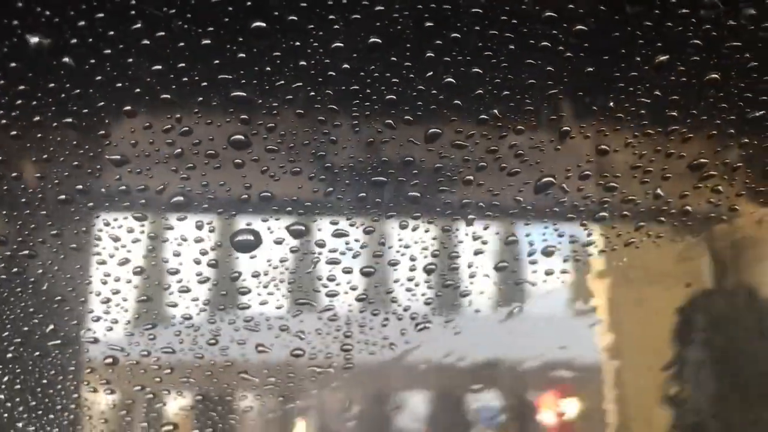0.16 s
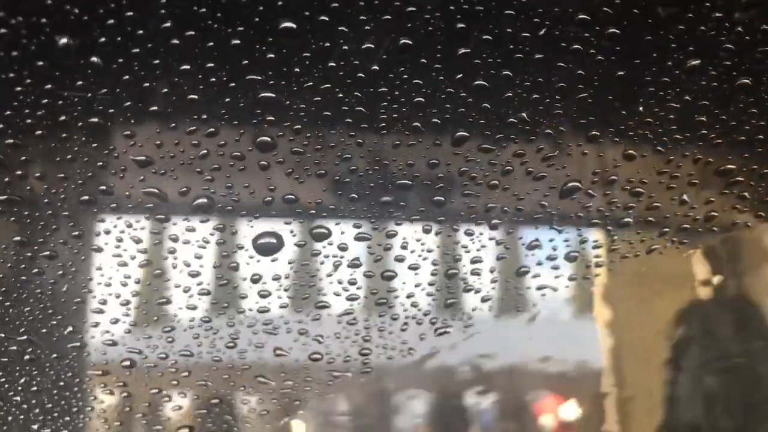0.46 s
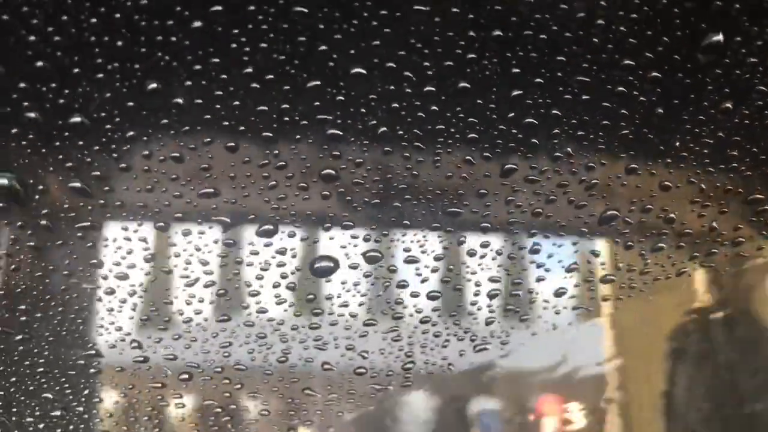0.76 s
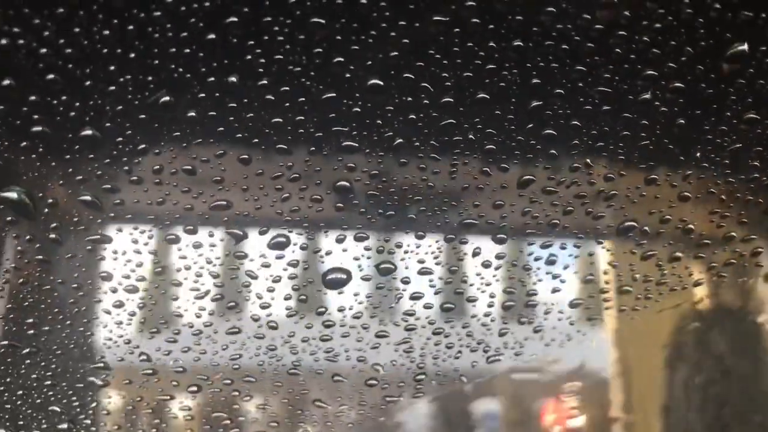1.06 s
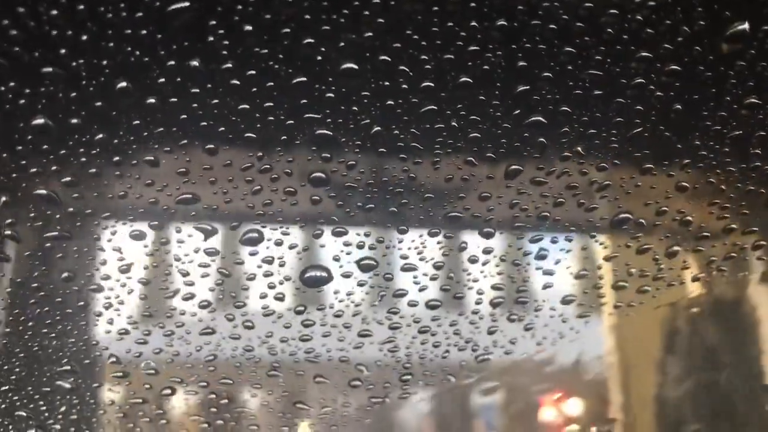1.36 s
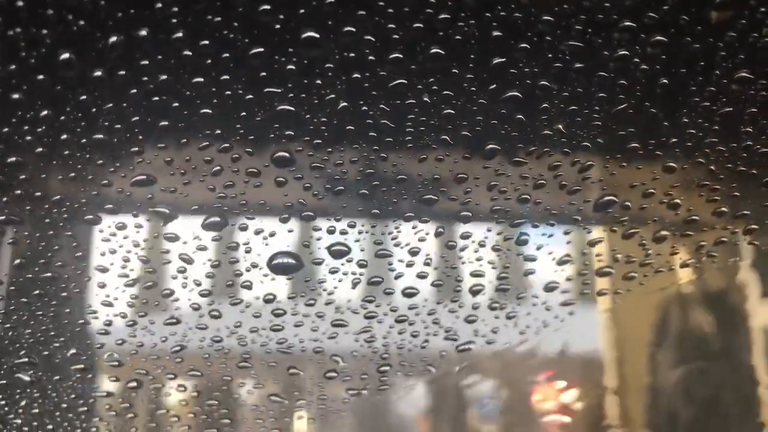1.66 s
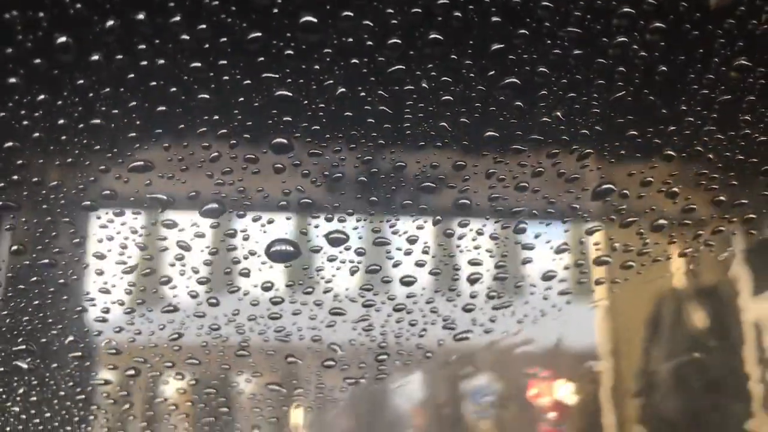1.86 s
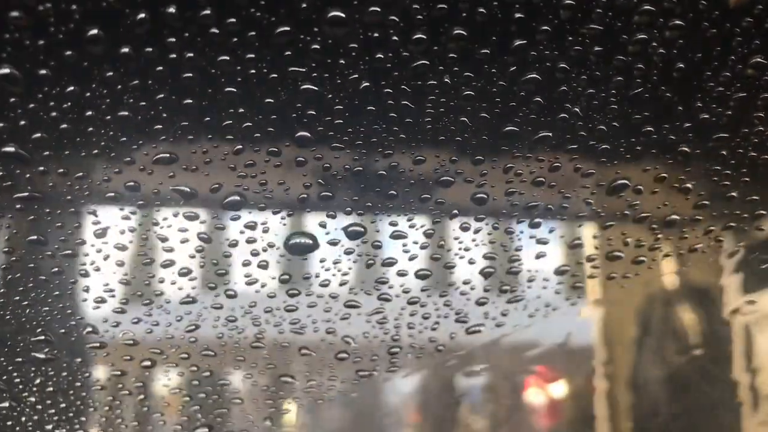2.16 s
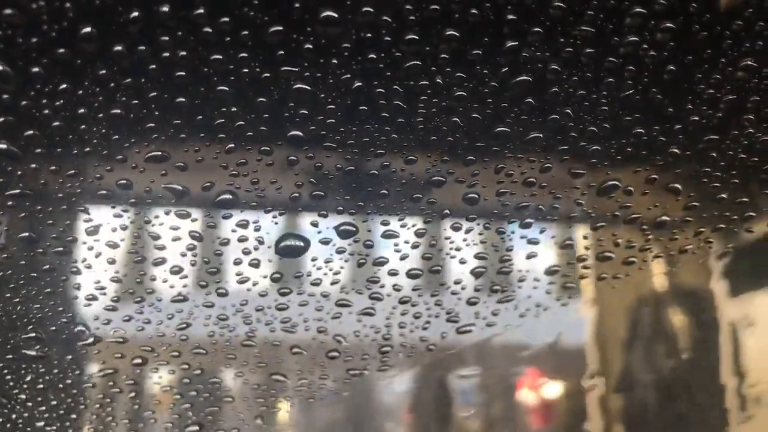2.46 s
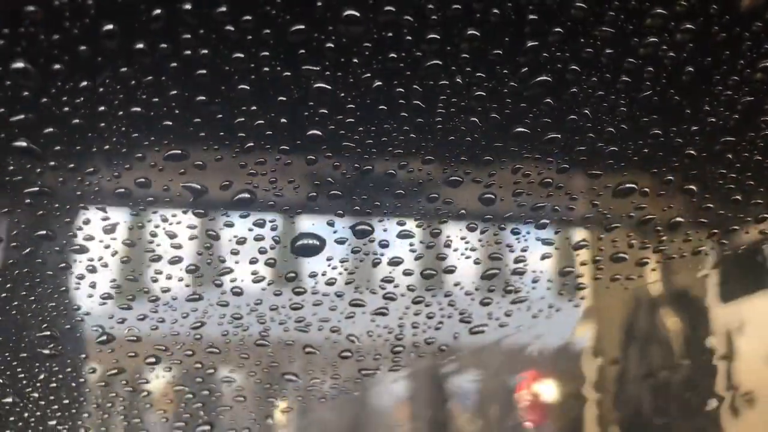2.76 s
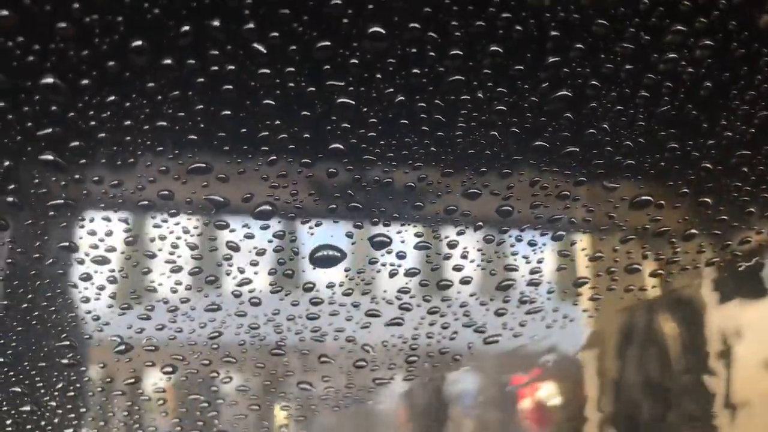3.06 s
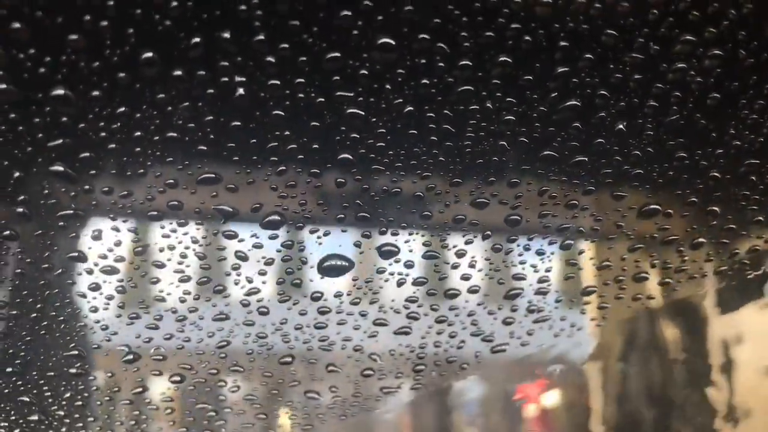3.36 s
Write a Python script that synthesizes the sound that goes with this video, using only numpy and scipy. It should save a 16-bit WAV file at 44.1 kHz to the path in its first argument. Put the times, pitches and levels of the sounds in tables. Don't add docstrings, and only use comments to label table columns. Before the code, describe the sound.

A constant booming motor drone from a car wash, heard in the cabin through wet glass, with muffled rumbling and distant water hiss, a small mid-way drop tap, and barely audible high whirs, on a phone microphone.

```python
import sys
import numpy as np
from scipy import signal
from scipy.fft import rfft, irfft
from scipy.io import wavfile
from scipy.ndimage import uniform_filter1d

SR = 44100
rng = np.random.default_rng(int(sys.argv[2]) if len(sys.argv) > 2 else 0)


def magnitude_from_level(level_db):
    exponent = np.asarray(level_db, float) / 20
    return 10 ** exponent


def to_wav(sig):
    pcm = np.clip(np.atleast_2d(sig), -1, 1) * 32767
    pcm = np.round(pcm).astype(np.int16)
    wavfile.write(sys.argv[1], SR, pcm.T)


N = 154350
T = np.arange(N) / SR
F = np.arange(N // 2 + 1) * SR / N + 1e-3

# time in seconds, level in dB.
DRONE_LOAD = [(0, -30), (.3, -30.5), (.5, -32), (.7, -28.5), (1.1, -29.5), (1.5, -27), (1.7, -29),
              (2.2, -27), (2.7, -29.5), (3.1, -27.5), (3.5, -29.5)]
# multiple of the shaft rate, level in dB, slow wander in dB.
MOTOR_HARMONICS = [(1, -26, 1), (2, 0, .2), (3, -15.5, .5), (4, -11.5, .3), (5, -29, 1), (6, -19, .5),
                   (7, -27, 1), (9, -26, .8), (11, -35, 1.5), (12, -36, 2), (19, -40, 2), (22, -41, 2)]
PANEL_SWELLS = {3: (2.0, .3, 6.5), 5: (3.05, .35, 11), 7: (2.6, .75, 6), 9: (2.9, .8, 6)}
# time in seconds, level in dB.
TENTH_PANEL = [
    (0, -57),
    (.4, -52),
    (1.0, -49),
    (1.6, -48),
    (1.9, -45),
    (2.3, -49),
    (2.9, -56),
    (3.5, -58),
]
# frequency in Hz, level in dB per Hz.
RUMBLE_COLOUR = [(12, -55), (20, -44), (51, -6), (86, -9), (123, -8.5), (202, -15), (369, -20.5),
                 (433, -22), (1400, -42.5), (1820, -49), (3080, -120)]
# time in seconds, level in dB.
BRUSH_PRESSURE = [(0, 1.1), (.4, 0), (.8, 0.8), (1.2, 0.5), (1.6, -0.5), (1.9, -0.1), (2.3, -0.9),
                  (2.9, -0.5), (3.2, -1.1), (3.5, 0)]
# frequency in Hz, level in dB per Hz.
SPRAY_COLOUR = [(710, -14.5), (1200, -2.5), (2180, -2.5), (2820, -3.5), (3780, -4.5), (4960, -6.5),
                (6090, -7), (10500, -19), (16000, -23)]
# frequency in Hz, width in Hz, gain in dB.
CABIN_TRIM = [(85, 6, -3), (108, 17, 1.5), (155, 19, -3), (205, 11, -3.5), (226, 12, 0), (296, 84, 3),
              (380, 7.8, 2), (409, 71, -4.5), (996, 176, 4), (2190, 140, 4), (2510, 900, -4), (2620, 44, 9),
              (3330, 46, 5.5), (3650, 21, 5), (3970, 54, 3.5), (4950, 370, -4), (7700, 870, -4.5),
              (10400, 570, -4.5)]
# time in seconds, level in dB, hardness (treble against body) in dB.
ROOF_TAPS = [
    (1.893, -50, 7),
    (1.8968, -38, -7),
    (1.906, -45, -10),
    (1.9215, -41, -18),
]
# frequency in Hz, level in dB, 60 dB decay time in seconds.
ROOF_MODES = [(310, 8, .04), (400, 9, .07), (465, 7, .07), (640, 1, .07), (900, -2, .07), (1250, -8, .06),
              (1800, -10, .06), (2000, -2, .1), (2220, -8, .06)]
# frequency in Hz, width in Hz, level in dB.
CRACK_COLOUR = [(800, 900, -6), (1400, 600, -9), (2100, 1000, -4), (4000, 3500, -13), (7500, 2000, -19),
                (14500, 4000, -24)]
# start in seconds, length in seconds, low whir in dB, high whir in dB.
LENS_STROKES = [
    (1.235, .04, -69, -70),
    (1.275, .085, -77, -67.5),
    (1.36, .1, -72, -70.5),
    (1.46, .05, -80, -73),
    (3.37, .1, -76, -71),
    (.42, .05, -84, -79),
]
# frequency in Hz, width in Hz, level in dB.
LENS_BELLS = [
    [(10900, 200, -6), (11350, 250, 0)],
    [(12800, 500, -4), (14000, 400, -8), (15350, 300, -9), (12500, 4500, 0)],
]
# time in seconds, share of full level.
JET_GUST = [
    (3.3, 0.13),
    (3.33, 0.92),
    (3.39, 0.5),
    (3.42, 0.074),
    (3.5, 0.11),
]
# frequency in Hz, level in dB.
ELECTRONIC_WHINE = [(15603, -88.5), (15160, -93.5)]


def unit(x):
    return x / np.sqrt(np.mean(x ** 2))


def curve(rows):
    return np.interp(T, *np.array(rows).T[:2])


def walk(rate):
    hold = int(SR / rate)
    levels = rng.standard_normal(N // 500)[:N // hold + 1]
    held = np.repeat(levels, hold)[:N]
    return 1.22 * uniform_filter1d(uniform_filter1d(held, hold), hold)


def bell(hz, width):
    return 1 / (1 + (2 * (F - hz) / width) ** 2)


def ringing(bells):
    gain = sum(magnitude_from_level(db) * bell(hz, width) for hz, width, db in bells)
    return unit(irfft(rfft(rng.standard_normal(N)) * gain, N))


def wash(points, swell_db, flicker_db, flicker_rate, bands_per_octave):
    hz, level_db = np.array(points).T
    colour_db = np.interp(np.log(F), np.log(hz), level_db, left=-90, right=-90)
    trim_db = sum(gain * bell(centre, width) for centre, width, gain in CABIN_TRIM)
    spectrum = rfft(rng.standard_normal(N)) * magnitude_from_level(colour_db + trim_db)
    place = bands_per_octave * np.log2(F / hz[0])
    common_swell = swell_db * walk(3)
    out = np.zeros(N)
    for k in range(int(bands_per_octave * np.log2(hz[-1] / hz[0])) + 2):
        band = irfft(spectrum * np.clip(1 - abs(place - k), 0, 1), N)
        out += band * magnitude_from_level(common_swell + flicker_db * walk(flicker_rate))
    return unit(out)


def shaft_turn():
    shaft_hz, first_beat_s = 39.047, .0065
    return 2 * np.pi * shaft_hz * (T - first_beat_s) + .02 * walk(3)


def panel_swell(k):
    peak, half, db = PANEL_SWELLS.get(k, (0, 1, 0))
    return db * np.exp(-((T - peak) / half) ** 2)


def motor(turn):
    odd_lag, drift = .9, .04
    load = curve(DRONE_LOAD)
    out = np.zeros(N)
    for k, db, wander_db in MOTOR_HARMONICS:
        base_db = load if k == 2 else load.mean()
        level_db = base_db + db + panel_swell(k) + wander_db * walk(3)
        phase = k * turn - odd_lag * (k % 2) + drift * max(k - 4, 0) * walk(1.5)
        out += magnitude_from_level(level_db) * np.cos(phase)
    return np.sqrt(2) * out


def tenth_panel(turn):
    return np.sqrt(2) * magnitude_from_level(curve(TENTH_PANEL)) * np.cos(10 * turn + 2 + .15 * walk(1.5))


def rumble(turn):
    throb = 1 + .06 * np.cos(2 * turn)
    noise = wash(RUMBLE_COLOUR, swell_db=.3, flicker_db=1.45, flicker_rate=6.09, bands_per_octave=3)
    return magnitude_from_level(-35.5 + curve(BRUSH_PRESSURE)) * noise * throb


def spray():
    return magnitude_from_level(-55) * wash(SPRAY_COLOUR, swell_db=.7, flicker_db=1.3, flicker_rate=9, bands_per_octave=5)


def taps():
    crack_db, crack_t60_s = -4, .055
    out, noise = np.zeros(N), ringing(CRACK_COLOUR)
    for start, db, hard_db in ROOF_TAPS:
        age = np.maximum(T - start, 0)

        def fade(t60):
            return (T >= start) * np.exp(-np.log(1000) * age / t60)

        ring = np.zeros(N)
        for hz, gain_db, t60 in ROOF_MODES:
            level = magnitude_from_level(gain_db + hard_db * (hz > 1000))
            ring += level * fade(t60) * np.sin(2 * np.pi * hz * age)
        crack = noise * fade(crack_t60_s) * magnitude_from_level(crack_db + hard_db)
        out += magnitude_from_level(db) * (ring / 2 + crack)
    return out


def lens():
    edge_s = .024
    out = np.zeros(N)
    for column, bells in enumerate(LENS_BELLS):
        whir = sum(magnitude_from_level(db + 1.5 * walk(40)) * ringing([(hz, width, 0)]) for hz, width, db in bells)
        whir = irfft(rfft(whir) * (F > 10600), N)
        gate = np.zeros(N)
        for start, length, *levels_db in LENS_STROKES:
            inside = np.minimum(T - start, start + length - T)
            gate += magnitude_from_level(levels_db[column]) * np.clip(inside / edge_s + .5, 0, 1)
        out += unit(whir) * gate
    return out


def jet():
    return magnitude_from_level(-67) * curve(JET_GUST) * ringing([(6100, 400, 0)])


def body_sway():
    return magnitude_from_level(-54) * ringing([(25, 14, 0)])


def whine():
    return sum(magnitude_from_level(db) * np.sin(2 * np.pi * hz * T) for hz, db in ELECTRONIC_WHINE)


def scene():
    turn = shaft_turn()
    machine = motor(turn) + tenth_panel(turn)
    water = rumble(turn) + spray() + jet()
    mix = machine + water + taps() + lens() + body_sway() + whine()
    fade_in_s = .002
    return mix[None] * np.minimum(T / fade_in_s, 1)


def roll_off(x):
    return signal.sosfilt(signal.butter(12, 16120, fs=SR, output="sos"), x)


def record(dry):
    top_cut = signal.ellip(12, .1, 40, 15740, fs=SR, output="sos")
    mix = signal.sosfiltfilt(top_cut, dry)
    return roll_off(mix)


dry = scene()
out = record(dry)
to_wav(out)
```